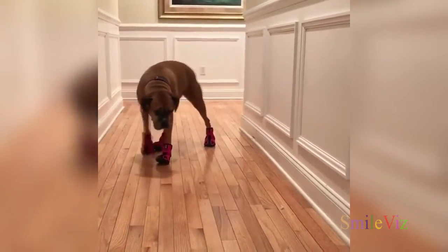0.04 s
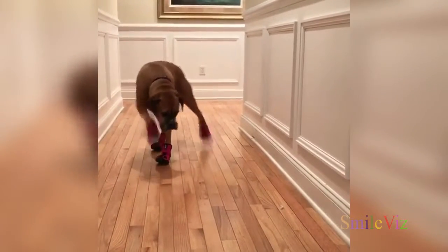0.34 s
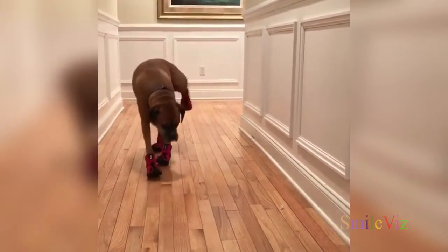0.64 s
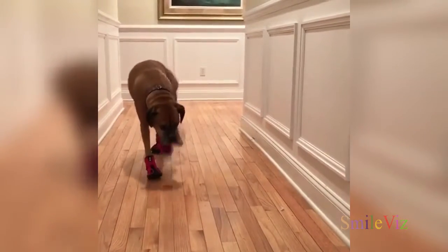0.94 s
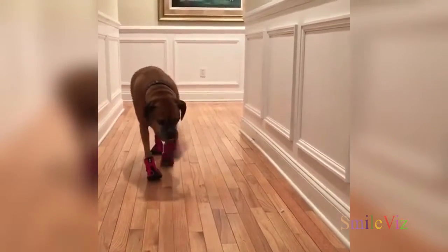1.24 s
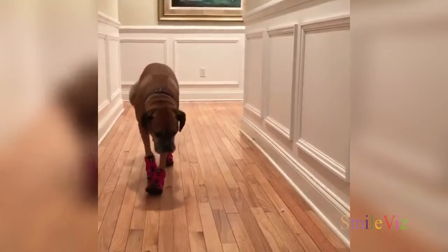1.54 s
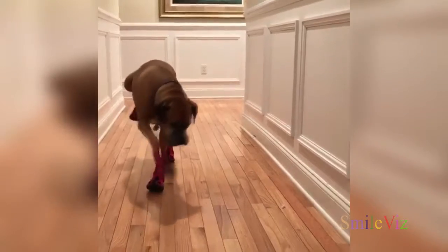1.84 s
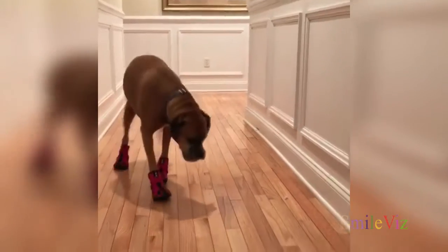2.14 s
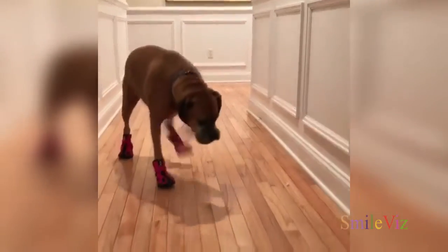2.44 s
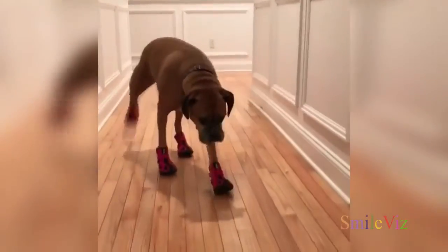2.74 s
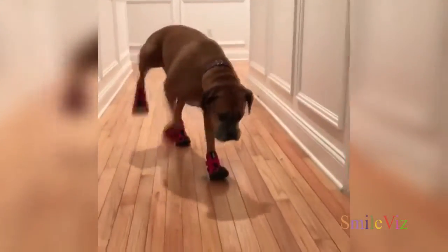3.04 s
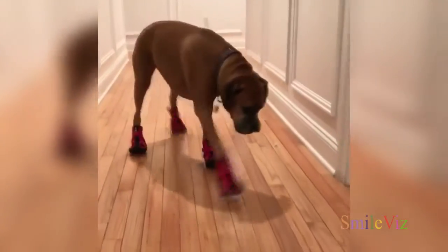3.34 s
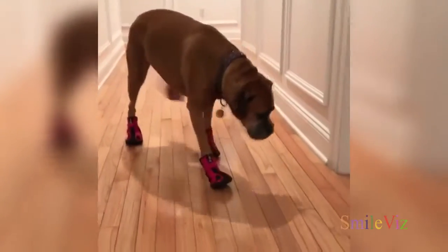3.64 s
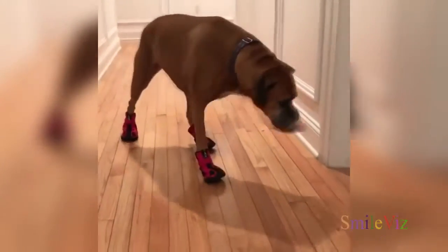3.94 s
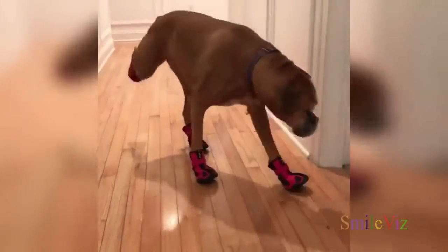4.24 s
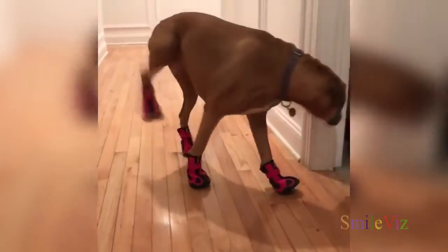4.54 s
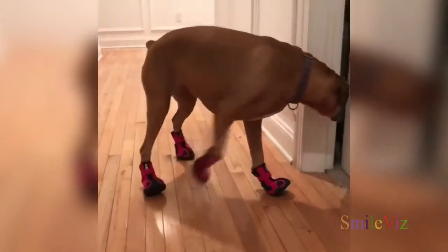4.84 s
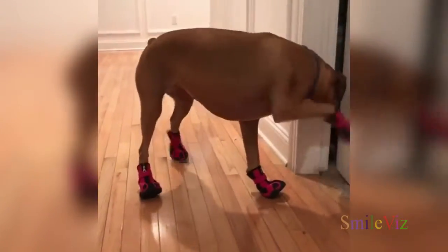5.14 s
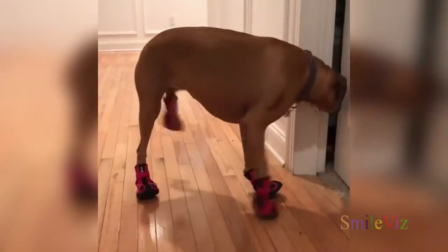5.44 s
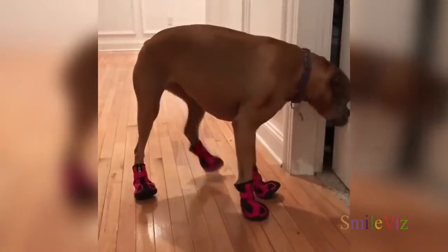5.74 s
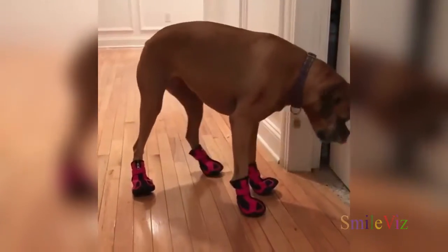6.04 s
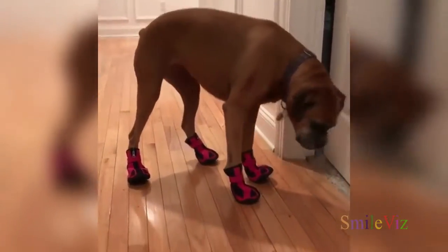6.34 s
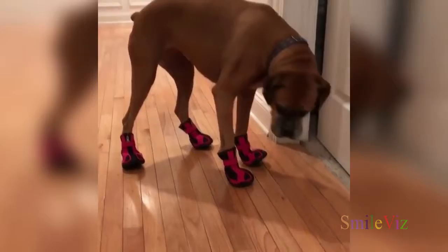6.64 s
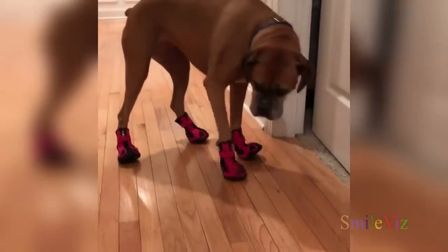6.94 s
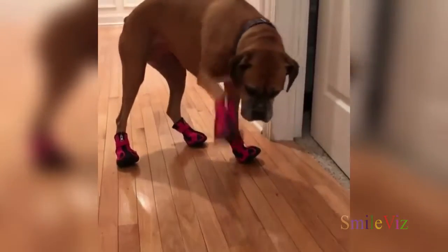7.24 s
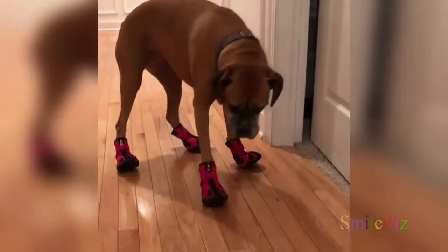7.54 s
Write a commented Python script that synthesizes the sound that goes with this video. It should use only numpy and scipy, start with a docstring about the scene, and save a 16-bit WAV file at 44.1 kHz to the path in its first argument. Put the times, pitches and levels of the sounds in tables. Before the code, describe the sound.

Uneven taps and knocks of a dog's boots on wooden floorboards sound nearby in a bare, slightly echoing hallway. A small jingle of collar tags comes with the first steps, and short rubbery scuffs follow midway. One step meets a door with a low bump; the walking then thins out and stops before a single final footfall. Faint rustling, thin squeaks and ventilation hum lie underneath.

```python
"""A dog in rubber-soled boots walks down a panelled hallway with a hardwood floor.
Each boot slaps a board and the dog's weight thuds into the floor; the soles scuff, the cloth rustles.
The collar's tags strike in one brief cluster, its metal ring jiggles, and one boot bumps a door.
The bare hallway reverberates; faint thin squeaks, house rumble and ventilation hum lie underneath."""
import sys
import numpy as np
from scipy import signal
from scipy.fft import rfft, irfft
from scipy.io import wavfile

SR = 44100
rng = np.random.default_rng(int(sys.argv[2]) if len(sys.argv) > 2 else 0)


def to_wav(sig):
    """Store sig (one row per channel, or 1-D mono) as 16-bit WAV at the path in sys.argv[1].

    Samples outside -1..1 are clipped; the rate is SR.
    """
    pcm = np.clip(np.atleast_2d(sig), -1, 1) * 32767
    pcm = np.round(pcm).astype(np.int16)
    wavfile.write(sys.argv[1], SR, pcm.T)  # frames by channels


N = 340011
T = np.arange(22500) / SR  # time axis of one event [s]

# house rumble and hiss (frequency [Hz], gain [dB])
HOUSE_SPECTRUM = [(20, -34.5), (40, -8.5), (65, -6), (119, -3), (140, -16.5), (237, -17.5), (286, -22.5),
                  (372, -19.5), (460, -32.5), (1190, -32.5), (1510, -39.5), (14000, -49)]
# ventilation hum (frequency [Hz], level [dB])
HUM_TONES = [(61, -55.5), (119, -59)]
# cloth stir, walking to standing (time [s], level [dB])
CLOTH_STIR = [(0, -72), (1.1, -70), (1.55, -66.5), (2.03, -74.5), (2.3, -64.5), (2.75, -63.5), (3.6, -73.5),
              (4.15, -65.5), (4.6, -73.5), (4.951, -65), (5.4, -81.5), (5.85, -75), (6.1, -64),
              (6.3, -78.5), (7.7, -82.5)]
# boot cloth (frequency [Hz], gain [dB])
CLOTH_SPECTRUM = [(100, -10), (500, 6.5), (1500, 2.5), (3200, 2), (5000, -1.5), (7500, -3.5), (11000, -5),
                  (14000, -4.5)]
# creep of planted soles (frequency [Hz], gain [dB])
SHUFFLE_SPECTRUM = [(150, -7.5), (500, 0.5), (1200, -0.5), (2000, -5), (3200, -2), (5000, -10),
                    (13000, -14.5)]
# boot landings (time [s], slap [dB], brightness [dB], weight [dB], board knock [dB],
# board knock [Hz], plank clack [Hz], boot hollow [Hz], relative hollow level [dB])
FOOTFALLS = [(0.0812, -6, -1, -24.5, -29.5, 303, 710, 2420, -5),
             (0.3667, -10.5, -8, -40.5, -36, 546, 740, 1900, -8),
             (0.6316, 4.5, 2, -23, -26.5, 308, 1130, 3220, 2),
             (1.2247, -20, 0, -59, -53, 480, 720, 2200, -19),
             (1.3715, -7, -11, -28, -30, 274, 1000, 1400, -14),
             (1.528, 0.5, -4.5, -21.5, -25, 282, 1290, 2060, 6.5),
             (2.093, 6, 6.5, -16, -39, 310, 1144, 2040, -4.5),
             (2.2433, 4, -4, -27.5, -16, 288, 970, 2160, -21),
             (2.508, -17, -2.5, -52, -35, 324, 1050, 2200, 4),
             (2.6406, -1.5, -4, -27.5, -22, 317, 1080, 1520, -10),
             (2.856, 7, -0.5, -18, -18, 315, 1100, 2130, -4),
             (3.3162, -2.5, -1.5, -16, -18, 240, 1130, 2330, -5),
             (3.507, 4, 3, -28, -19, 312, 1160, 2450, -0.5),
             (3.816, -13.5, -18, -46, -34, 275, 920, 1300, -19),
             (3.9803, -4, -1.5, -30, -23.5, 280, 1150, 1980, 7),
             (4.3051, -3, -4, -28, -22.5, 299, 680, 1690, 3.5),
             (4.858, 1.5, -2, -20.5, -20, 283, 1320, 2570, 5.5),
             (5.2414, -3, -2, -18, -18.5, 305, 940, 1550, 3),
             (5.584, -16.5, -2, -43, -40.5, 296, 912, 2000, -16),
             (5.938, -9.5, -6, -30.5, -21, 323, 473, 1420, -9),
             (7.575, -4.5, 1.5, -30, -20.5, 333, 1514, 2190, -3)]
# sole on wood (frequency [Hz], gain [dB])
SLAP_SPECTRUM = [(60, -21), (200, 5.5), (380, 7), (480, 0), (650, 5), (860, 1), (1150, 1.5), (1600, -2),
                 (2600, -3.5), (4000, -7), (6500, -14.5), (9000, -21), (11000, -29), (14000, -35.5)]
# treble added by a harder landing (frequency [Hz], gain per brightness [dB/dB])
SLAP_TILT = [(1200, 0), (1800, 1), (3500, 2), (7000, 2.5), (12000, 2)]
# plank modes (ratio to clack frequency, relative level [dB])
PLANK_MODES = [(1, -0.5), (2.76, -7), (5.4, -5)]
# tag strikes (time [s], level [dB])
TAG_STRIKES = [(.393, -22.5), (.3975, -28), (.403, -20), (.4065, -28), (.442, -36)]
# tag modes (frequency [Hz], level [dB], t60 [s])
TAG_MODES = [(5800, -15, .05), (8500, -13, 0.037), (9240, 0.5, 0.069), (9278, -9, 0.12), (9620, -10, .06),
             (13100, -13, .06)]
# tag-on-tag clash (frequency [Hz], gain [dB])
CLASH_SPECTRUM = [(700, -12.5), (2500, -6.5), (5500, -1.5), (8900, 0), (9300, 18), (9800, -4), (11000, -7),
                  (12400, -2), (13000, 6.5), (14000, -10)]
# thin squeaks (time [s], level [dB], frequency [Hz], length [s])
SQUEAK_EVENTS = [(0.92, -73, 3160, 0.2), (4.529, -65.5, 3240, 0.076), (5.661, -73.5, 3280, 0.43),
                 (5.98, -73.5, 3420, 0.28), (6.02, -60.5, 2850, 0.034), (6.528, -70.5, 1170, 0.032)]
# collar ring shaken by head bobs (time [s], level [dB], 1/e decay [s])
RING_JIGGLES = [(1.222, -54, 0.0087), (1.24, -67, 0.068), (1.545, -60, 0.028), (1.725, -64.5, .025),
                (4.275, -57, 0.035)]
# collar ring modes (frequency [Hz], level [dB], t60 [s])
RING_MODES = [(7210, -3, 0.027), (8600, -8, 0.03), (11050, 0, .025)]
# soles brushing wood (time [s], relative level [dB], 1/e decay [s], tilt [dB/octave])
SCUFF_EVENTS = [(1.3528, -51, 0.0039, 6.5), (1.901, -53.5, 0.034, 2.5), (2.6, -18, 0.002, -4.5),
                (2.607, -24.5, 0.014, -2.5), (2.6548, -22.5, 0.004, -5), (2.7, -41, 0.023, 3),
                (3.0134, -27.5, 0.0044, -2), (3.047, -29.5, 0.0078, -4), (3.0734, -36, 0.017, -1.5),
                (3.2772, -53, 0.0072, 4), (4.167, -59.5, 0.007, 7.5), (4.2162, -55.5, 0.0065, 5.5),
                (4.294, -48, 0.013, 4), (4.367, -51.5, 0.0056, 5), (4.8095, -41, 0.0023, 0.5),
                (5.2406, -24.5, 0.0013, 2), (6.0311, -57, 0.02, 4), (7.1996, -59, 0.023, 0.5)]
# rubber slipping on varnish (frequency [Hz], gain [dB])
SCUFF_SPECTRUM = [(100, -13.5), (400, -3.5), (1500, 2), (3000, 0.5), (6000, -4.5), (10000, -9),
                  (14000, -15.5)]
# door panel modes (frequency [Hz], level [dB], t60 [s])
DOOR_MODES = [(95.8, -27, 0.7), (128, -26.5, 0.37), (165.6, -31.5, 0.24), (281, -36, 0.096),
              (349, -25.5, 0.16), (390, -9.5, 0.05), (500, -48, 0.91)]
# hallway decay (frequency [Hz], t60 [s])
HALL_T60 = [(100, 0.32), (260, 0.44), (700, 0.61), (1840, 0.51), (4850, 0.36), (9000, 0.29), (14000, 0.22)]
# first wall reflections (delay [s], gain)
WALL_ECHOES = [(.0017, 0.27), (.0076, 0.22), (0.0106, .3), (0.0144, 0.23)]


def amp(db):
    """Decibels to gain."""
    return 10 ** (np.asarray(db) / 20)


def unit_rms(x):
    """Scale to rms 1."""
    return x / np.sqrt(np.mean(x ** 2) + 1e-20)


def lookup(points, hz):
    """Interpolate a table over log frequency."""
    knots_hz, values = np.transpose(points)
    return np.interp(np.log(hz + 1), np.log(knots_hz), values)


def add(mix, at_s, sound):
    """Mix a sound in at at_s."""
    part = mix[round(at_s * SR):][:len(sound)]
    part += sound[:len(part)]


def colour(x, spectrum, db_per_octave=0, pivot_hz=1100, shelf_hz=7000, size=8192):
    """Minimum-phase filter from a spectrum, tilted between pivot and shelf."""
    hz = np.fft.rfftfreq(size, 1 / SR)
    octaves = np.log2(np.clip(hz, pivot_hz, shelf_hz) / pivot_hz)
    cepstrum = irfft(np.log(amp(lookup(spectrum, hz) + db_per_octave * octaves)))
    cepstrum[1:size // 2] *= 2
    cepstrum[size // 2 + 1:] = 0
    impulse = irfft(np.exp(rfft(cepstrum)))[:size // 2]
    return signal.oaconvolve(x, impulse)[:len(x)]


def decay(t, t60_s):
    """Envelope falling 60 dB in t60_s."""
    return np.exp(-np.log(1000) * t / t60_s)


def struck(modes):
    """Struck modes: damped sines."""
    return sum(amp(db) * decay(T, t60_s) * np.sin(2 * np.pi * hz * T) for hz, db, t60_s in modes)


def resonance(x, hz, width_hz):
    """Resonator with unity peak gain."""
    return signal.lfilter(*signal.iirpeak(hz, hz / width_hz, fs=SR), x)


def grains(size, per_s, spread_db):
    """Scattered clicks of random sign and strength, rms 1."""
    strength = amp(spread_db * np.minimum(rng.exponential(1, size), 4))
    return unit_rms(rng.choice([-1, 1], size) * strength * (rng.random(size) < per_s / SR))


def radiate(x, lowest_hz):
    """A panel radiates little below its lowest mode."""
    return signal.sosfilt(signal.butter(2, lowest_hz, "highpass", fs=SR, output="sos"), x)


def hallway(early_db, tail_db, build_s=0.00058):
    """Impulse response: quick scatter between close walls, then a tail with uneven t60 per band."""
    build = 1 - np.exp(-T / build_s)
    scatter = grains(len(T), per_s=9000, spread_db=1) * build * decay(T, t60_s=0.075)
    hz, t, bands = signal.stft(rng.standard_normal(len(T)) * build, SR, nperseg=256)
    t60_s = lookup(HALL_T60, hz) * np.exp(0.16 * rng.uniform(-1.1, 1, len(hz)))
    tail = signal.istft(bands * decay(t, t60_s[:, None]), SR, nperseg=256)[1][:len(T)]
    return amp(early_db) * scatter / np.linalg.norm(scatter) + amp(tail_db) * tail / np.linalg.norm(tail)


def echoed(x, response):
    """Direct sound plus reverberation."""
    return x + signal.fftconvolve(x, response)[:len(x)]


def house(noise_db=-55, waver_rad=1.3):
    """Low rumble and thin hiss, with a wavering ventilation hum."""
    t = np.arange(N) / SR
    out = amp(noise_db) * unit_rms(colour(rng.standard_normal(N), HOUSE_SPECTRUM))
    knots_s = np.linspace(0, t[-1], 60)
    for hz, db in HUM_TONES:
        waver = np.interp(t, knots_s, rng.standard_normal(len(knots_s)))
        out += amp(db) * np.sin(2 * np.pi * hz * t + waver_rad * waver)
    return out


def cloth_motion(attack_s=0.017, release_s=0.06, snap_db=8.5, snap_s=0.004):
    """Cloth gain: steady stir, lifted as each landing snaps the boot taut and creases it."""
    swell = (1 - np.exp(-T / attack_s)) * np.exp(-T / release_s)
    crease = swell + amp(snap_db) * np.exp(-T / snap_s)
    flex = np.ones(N)
    for at_s, slap_db, *_ in FOOTFALLS:
        crease_db = 9 + 0.41 * slap_db
        add(flex, at_s, amp(crease_db) * crease)
    stir_db = np.interp(np.arange(N) / SR, *np.transpose(CLOTH_STIR))
    return amp(stir_db) * flex


def rustle():
    """Boot cloth crackles as it moves."""
    crackle = unit_rms(colour(grains(N, per_s=1000, spread_db=4.5), CLOTH_SPECTRUM))
    return echoed(crackle * cloth_motion(), hallway(early_db=-0.5, tail_db=2.5))


def shuffle(level_db=-77, slip_s=0.02):
    """Planted soles creep on the varnish in soft, randomly timed slips."""
    onsets = abs(grains(N, per_s=14, spread_db=2.3))
    slips = signal.oaconvolve(onsets, T * np.exp(-T / slip_s))[:N]
    return amp(level_db) * unit_rms(colour(slips * rng.standard_normal(N), SHUFFLE_SPECTRUM))


def slap(bright_db, lead_s):
    """The sole's edge crunches down; its flat claps on the wood at lead_s."""
    clap_at = round(lead_s * SR)
    crisp = amp(0.089 * bright_db)  # flatter landing: more clap, shorter crunch
    crunch_s = 0.0016 / crisp ** 2
    contact = amp(-26) * rng.standard_normal(len(T)) * np.exp(-abs(T - T[clap_at]) / crunch_s)
    contact[clap_at] += amp(0.5) * crisp
    for delay_s, gain in WALL_ECHOES:
        contact[clap_at + round(delay_s * rng.uniform(0.9, 1.1) * SR)] += gain
    add(contact, lead_s, hallway(early_db=0.5, tail_db=0.5))
    tilt = [(hz, share * bright_db) for hz, share in SLAP_TILT]
    return colour(colour(contact, SLAP_SPECTRUM), tilt)


def plank(x, clack_hz, ring_db=-2.5, base_width_hz=120):
    """The plank under the boot boosts its own modes."""
    return x + sum(amp(ring_db + db) * resonance(x, clack_hz * ratio, base_width_hz * np.sqrt(ratio))
                   for ratio, db in PLANK_MODES)


def disperse(x, delay_at_1khz_s=0.0005):
    """Bending waves in a board carry treble faster than bass."""
    hz = np.fft.rfftfreq(len(x), 1 / SR)
    lag_cycles = 2 * delay_at_1khz_s * np.sqrt(1000 * hz)
    return irfft(rfft(x) * np.exp(-2j * np.pi * lag_cycles), len(x))


def boot_hollow(x, hz, relative_db, seal_s=0.08):
    """Air cupped in the boot resonates, choked as the sole presses flat."""
    return x + amp(relative_db + 2.5) * resonance(x * np.exp(-T / seal_s), hz, width_hz=240)


def thud(weight_db, board_db, board_hz, floor_hz=168, floor_t60_s=0.044, board_t60_s=0.037):
    """The leg's weight bends the floor and knocks the board."""
    bend = struck([(floor_hz, weight_db, floor_t60_s)])
    knock = struck([(board_hz, board_db, board_t60_s)])
    load = 1 - np.exp(-T / 0.0015)
    boom = radiate(amp(3) * (knock - bend) * load, lowest_hz=111)
    return echoed(boom, hallway(early_db=-7.5, tail_db=-3.5, build_s=0.0071))


def footfalls(lead_s=0.008):
    """Per landing: a slap shaped by plank and boot, and a thud."""
    out = np.zeros(N)
    for step in FOOTFALLS:
        at_s, slap_db, bright_db, weight_db, board_db, board_hz, clack_hz, hollow_hz, hollow_db = step
        sole = amp(slap_db) * slap(bright_db, lead_s)
        clack = disperse(plank(sole, clack_hz))
        add(out, at_s - lead_s, boot_hollow(clack, hollow_hz, hollow_db))
        add(out, at_s, thud(weight_db, board_db, board_hz))
    return out


def collar_tags(chime_db=-9, clash_db=-4, clash_s=0.0029):
    """Tags strike each other: a chattering clash plus ringing modes."""
    out = np.zeros(N)
    for at_s, level_db in TAG_STRIKES:
        clash = grains(len(T), per_s=3300, spread_db=4) * np.exp(-T / clash_s)
        clash += np.linalg.norm(clash) * hallway(early_db=-5.5, tail_db=4.5)
        chime = echoed(struck(TAG_MODES), hallway(early_db=-10, tail_db=-2.2))
        clink = amp(chime_db) * chime + amp(clash_db) * colour(clash, CLASH_SPECTRUM)
        add(out, at_s, amp(level_db) * clink)
    return out


def squeaks():
    """Faint narrow-band noise swells and fades."""
    out = np.zeros(N)
    for at_s, level_db, hz, length_s in SQUEAK_EVENTS:
        noise = rng.standard_normal(round(length_s * SR))
        width_hz = 0.17 * hz
        tone = resonance(resonance(noise, hz, width_hz), hz, width_hz)
        add(out, at_s, amp(level_db) * unit_rms(tone) * np.hanning(len(tone)))
    return echoed(out, hallway(early_db=5, tail_db=0))


def collar_ring(tick_db=-3):
    """Flurries of light taps tick on the metal ring and excite its modes unevenly."""
    out = np.zeros(N)
    ring_norm = np.linalg.norm(struck(RING_MODES))
    for at_s, level_db, decay_s in RING_JIGGLES:
        for mode in RING_MODES:
            taps = grains(len(T), per_s=400, spread_db=3.5) * np.exp(-T / decay_s)
            tinkle = signal.fftconvolve(taps, struck([mode]) / ring_norm)[:len(T)]
            ticks = amp(tick_db) * resonance(taps, hz=mode[0], width_hz=3500)
            add(out, at_s, amp(level_db) * echoed(tinkle + ticks, hallway(early_db=1, tail_db=-4.5)))
    return out


def scuffs():
    """Rubber slips on varnish in short bursts; reverberation builds during each."""
    out = np.zeros(N)
    for at_s, relative_db, decay_s, db_per_octave in SCUFF_EVENTS:
        slip = grains(len(T), per_s=2800, spread_db=3) * np.exp(-T / decay_s)
        slip += np.linalg.norm(slip) * hallway(early_db=-3.5, tail_db=-4, build_s=decay_s)
        add(out, at_s, amp(relative_db + 1.5) * colour(slip, SCUFF_SPECTRUM, db_per_octave))
    return out


def door(at_s=5.2425):
    """A boot bumps the door; the panel booms."""
    out = np.zeros(N)
    boom = radiate(struck(DOOR_MODES), lowest_hz=59.7)
    add(out, at_s, echoed(boom, hallway(early_db=-9.5, tail_db=-12.5)))
    return out


def scene():
    """Mono sum of all sources."""
    mix = footfalls() + scuffs() + rustle() + squeaks() + collar_tags() + door()
    return (mix + house() + collar_ring() + shuffle())[None]


def record(dry, ceiling=0.95, cutoff_hz=14200):
    """Soft peak limit, then low-pass."""
    limited = dry / (1 + (dry / ceiling) ** 6) ** (1 / 6)
    lowpass = signal.firwin(255, cutoff_hz, window=("kaiser", 8), fs=SR)
    return signal.oaconvolve(limited, lowpass[None], "same")


dry = scene()
out = record(dry)
to_wav(out)
```